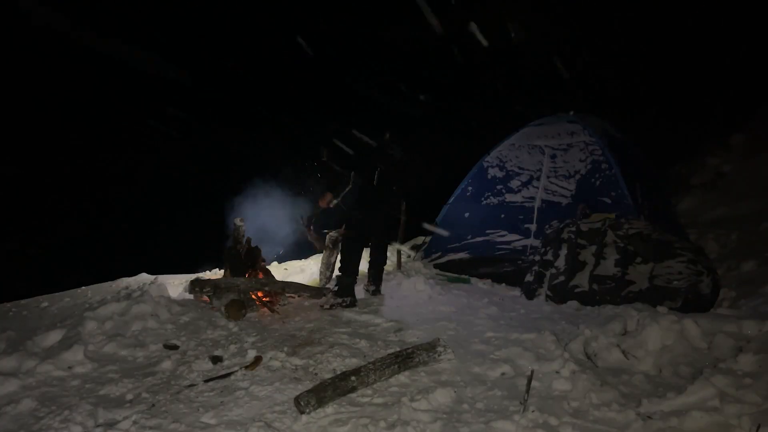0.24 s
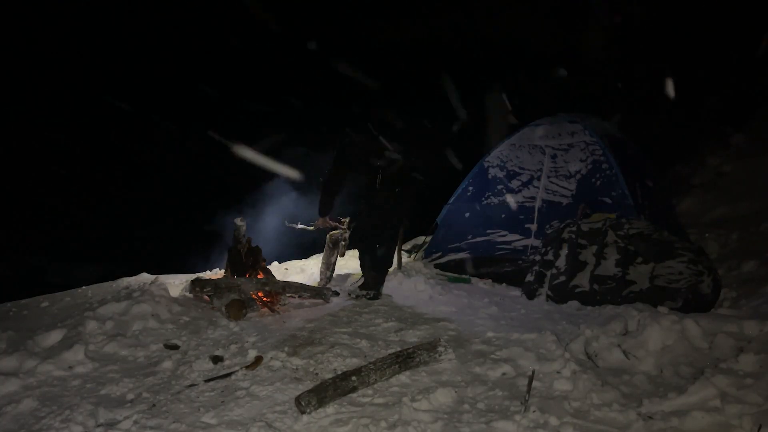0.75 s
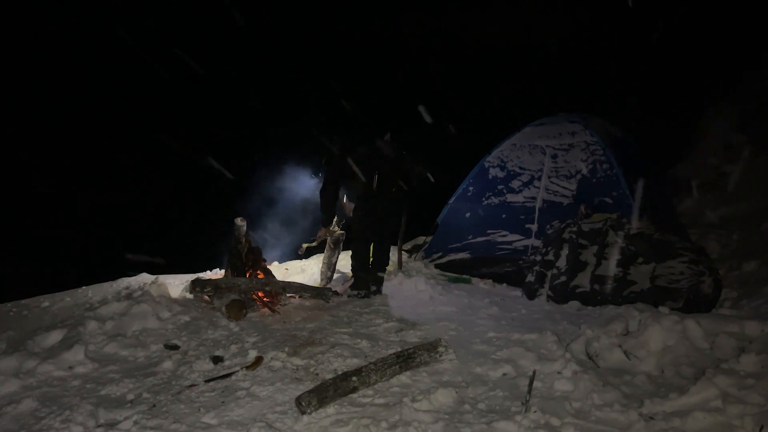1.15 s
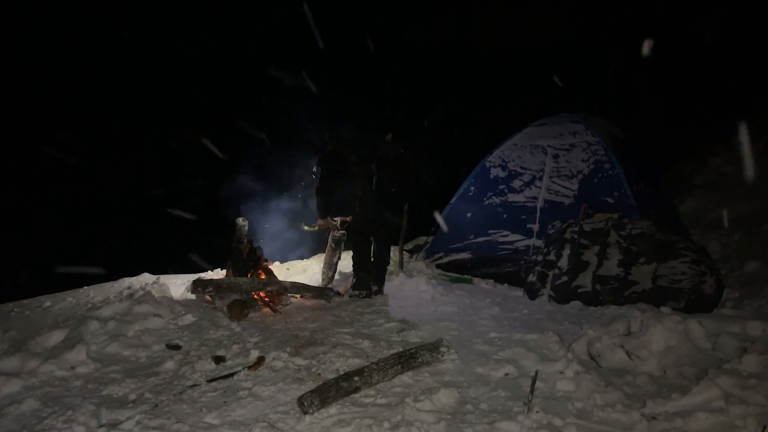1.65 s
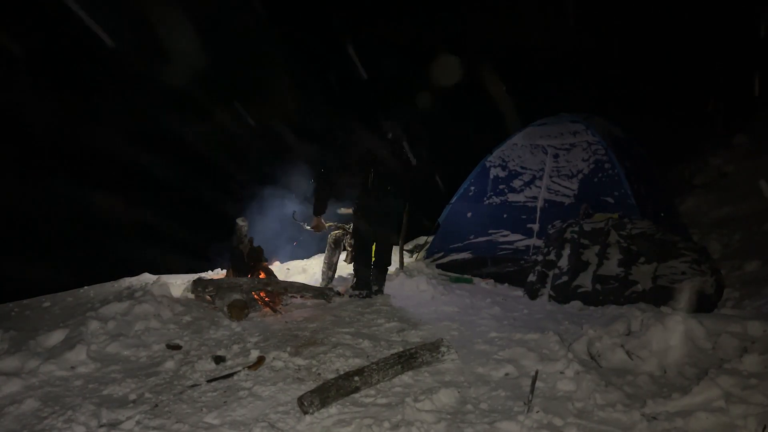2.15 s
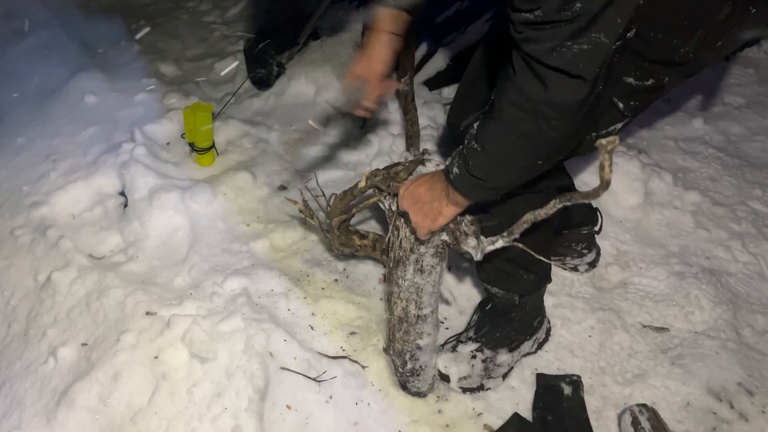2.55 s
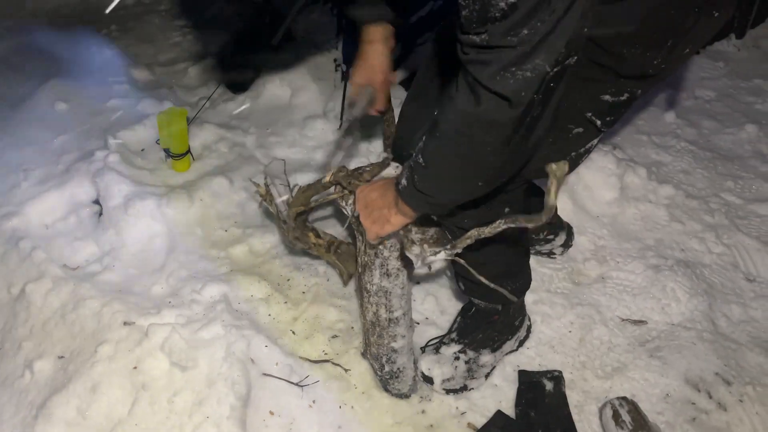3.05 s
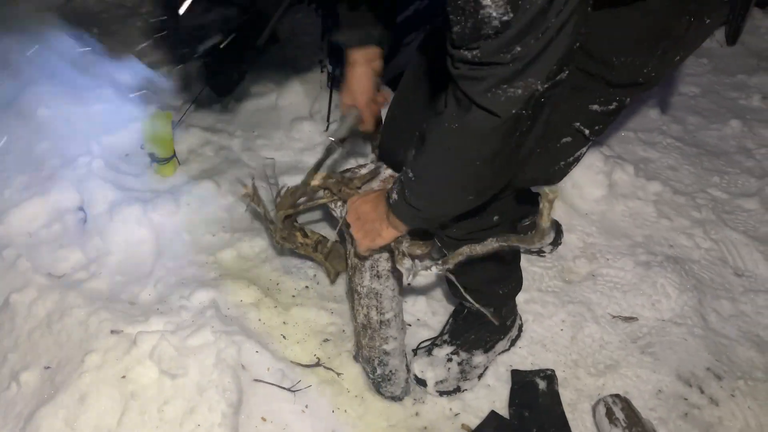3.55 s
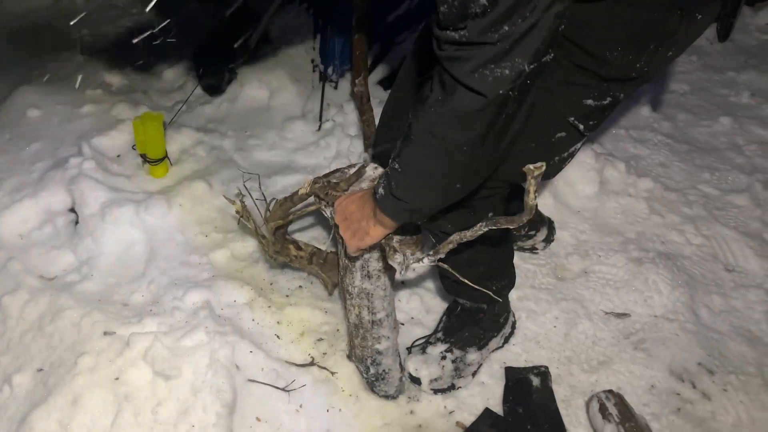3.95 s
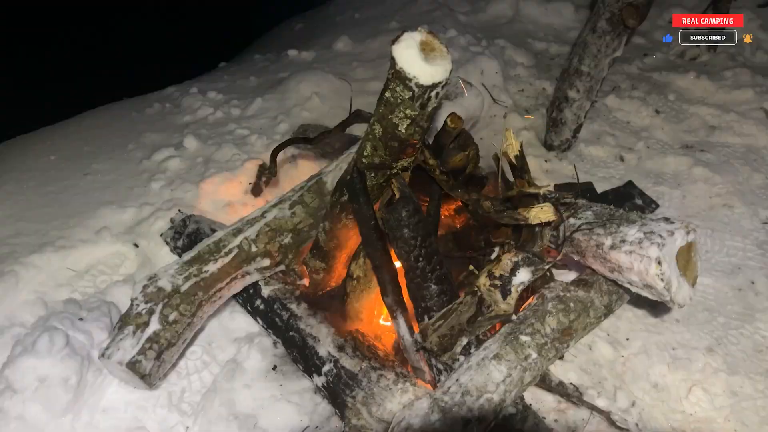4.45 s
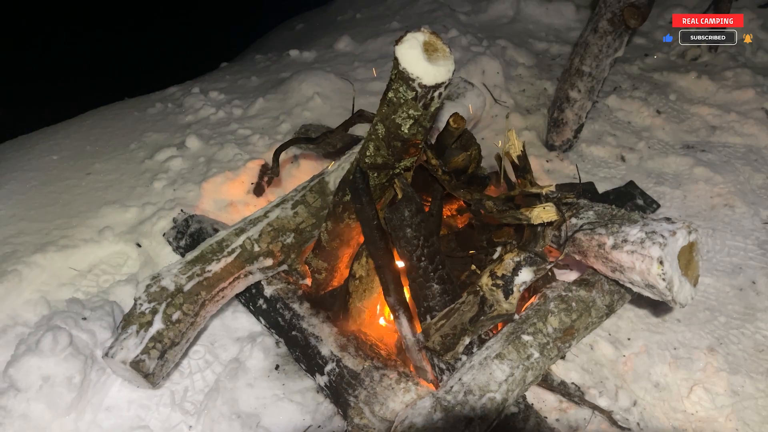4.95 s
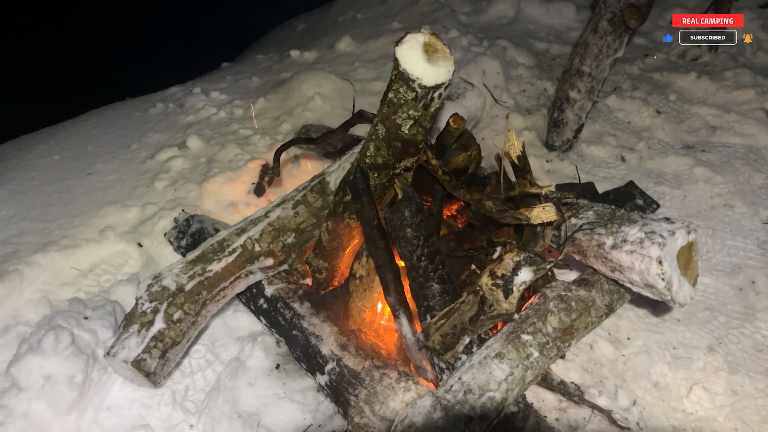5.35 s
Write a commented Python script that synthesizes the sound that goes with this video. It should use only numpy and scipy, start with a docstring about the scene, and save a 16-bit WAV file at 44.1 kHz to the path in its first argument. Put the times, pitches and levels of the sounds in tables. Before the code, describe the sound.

A windy snow camp heard close and dry. Low rumble is strongest at the start, calmer in the middle and heaviest at the end. Gusts near one second bring soft air thumps and two bright snaps. A steady row of hard tick-knocks, like something striking wood, occupies the middle, each very short. Afterwards gusts return with grainy snow hiss, fire snaps and sizzling spits.

```python
"""At a snowy camp by night, wind rumbles on a pair of close microphone ports over a steady far hiss.
Turbulence is noise shaped in spectrum and level; gusts carry snow past, with a fine high snow hiss
that swells with them, stronger after 4 s. A campfire snaps as noise cracks with wood rings, and spits
as thin high noise bursts. Even double clicks from the left are struck resonances; two brief husky
tones glide upward."""
import sys
import numpy as np
from scipy import signal
from scipy.fft import rfft, irfft, next_fast_len
from scipy.io import wavfile
from scipy.ndimage import uniform_filter1d, map_coordinates

SR = 44100
rng = np.random.default_rng(int(sys.argv[2]) if len(sys.argv) > 2 else 0)


def store_wav(level_fs):
    """Save 16-bit WAV to argv[1]."""
    pcm = np.round(np.clip(np.atleast_2d(level_fs), -1, 1) * 32767)
    wavfile.write(sys.argv[1], SR, pcm.T.astype(np.int16))


N = 246959  # samples

# Spectra below are relative shapes, since each noise is brought to rms 1.
# Wind strength and the deepest heave, before fixed offsets: time_s, strength_db, heave_db
WIND_COURSE = [(0.0, -34, -43), (0.81, -38.5, -50), (0.97, -37, -58), (1.5, -40, -55), (2.04, -37.5, -57),
               (2.17, -38.5, -56), (2.63, -38, -66), (2.87, -38.5, -64), (3.18, -38.5, -49),
               (3.9, -39, -60), (4.37, -30, -45), (4.7, -29, -46), (5.29, -26.5, -30), (5.6, -28.5, -32.5)]
# How much more the eddies differ between the ports: time_s, difference_db
CROSSWIND_COURSE = [(0, 9), (1.6, 3), (2.2, 2), (4.2, 0), (5.6, -7)]
# Spectrum of the deepest wind heave: frequency_hz, density_db (per Hz)
HEAVE_SPECTRUM = [(12, -42), (22, -24), (32, -13), (45, 13), (58, 11), (75, -45)]
# Spectrum of the wind rumble: frequency_hz, density_db (per Hz)
RUMBLE_SPECTRUM = [(26, -57), (45, -24.5), (64, 0), (81, 1), (104, -0.5), (145, -8), (300, -17), (390, -31),
                   (660, -120)]
# Spectrum of the small eddies: frequency_hz, density_db (per Hz)
FLUTTER_SPECTRUM = [(90, -14.5), (160, 1), (300, -4.5), (600, -7.5), (1000, -18), (1600, -54)]
FLUTTER_DB, FLUTTER_GROWS = -44, 0.27  # at mean wind; dB for each dB of wind
# Gusts that carry snow past: start_s, hold_s, snow_db, flutter_db
GUST_EVENTS = [(-.03, 0.35, -55.5, -42.5), (.98, .31, -46.5, -35), (1.41, 0.13, -46, -36.5),
               (4.2, .4, -49, -37), (4.668, 0.079, -44, -38), (4.852, 0.1, -45, -35),
               (5.153, 0.24, -48.5, -38), (5.46, .2, -50.5, -42)]
GUST_ATTACK_S, GUST_FALL_DB_PER_S = 0.033, 142
# Spectrum of blown snow: frequency_hz, density_db (per Hz)
SNOW_SPECTRUM = [(600, 4), (1200, 14), (2500, 8.5), (3600, 7), (5000, 5.5), (6500, 5), (9000, -0.5),
                 (10500, -31), (12500, -12), (15700, -20), (16000, -60)]
DRIFT_DB, DRIFT_GROWS = -61.5, 2  # loose snow at mean wind; dB for each dB of wind
SNOW_PATCHY_DB = 1  # spread of the random patches in snow and fine hiss
# Spectrum of the fine high snow hiss, which also shapes the spits: frequency_hz, density_db (per Hz)
FINE_HISS_SPECTRUM = [(9000, -24), (12000, -7), (14000, 2), (15700, -5), (16100, -50)]
FINE_HISS_DB = -14  # over the snow
FINE_HISS_RISE_S, FINE_HISS_RISE_DB = 4, 4  # when the fine hiss grows stronger, and by how much
# Spectrum of the far hiss: frequency_hz, density_db (per Hz)
HISS_SPECTRUM = [(240, -15), (500, -2), (900, -2), (1400, -9), (2100, -7.5), (3500, -22), (5200, -24.5),
                 (6000, -27), (7500, -19), (8300, -23.5), (9200, -33), (10400, -18.5), (11200, -22),
                 (12200, -37), (13200, -46)]
# Phase of the hiss as it wraps round the ports from the left: frequency_hz, left_lead_rad
HISS_PHASE_LEAD = [(100, .2), (600, 2.1), (1000, 2.8), (1600, 5.4), (2300, 6.4), (3350, 9.2), (3800, 12.3),
                   (4700, 14.6), (5500, 14.6), (6500, 12.1), (7600, 13.4), (8500, 12.6), (9000, 12.5),
                   (9700, 10), (11000, 8.2), (11800, 6.3)]
# Shading of the hiss between the ports: frequency_hz, left_over_right_db
HISS_SHADING = [(400, 1.5), (800, 4.5), (1100, -0.6), (1600, 3), (2600, -2.5), (4400, -.3), (5200, 11.5),
                (6400, 0), (7000, 5.5), (8600, .2)]
HISS_DB, HISS_SCATTERED_DB = -37, -9.5  # direct hiss; the part each port hears alone, over it
# Air pushes on the ports: time_s, peak_db, pitch_hz
AIR_PUSHES = [(.052, -19, 344), (.28, -21.5, 240), (1.018, -21.5, 520), (1.04, -18.5, 178),
              (1.119, -19, 397), (1.139, -16.5, 520), (1.142, -17.5, 150), (1.321, -20, 530),
              (1.404, -19, 700), (4.442, -16.5, 440), (4.561, -18, 221), (4.952, -9, 497)]
ONE_CYCLE_HZ, SHORTENS = 314, 0.61  # a push at this pitch lasts one cycle; higher ones fewer, by this power
# Fire snaps; ring and knock are relative to the crack before a shared lift:
# start_s, peak_db, wood_pitch_hz, ring_db, low_knock_hz, low_knock_db, left_over_right_db
FIRE_SNAPS = [(1.193, 2, 2920, 4, 1750, -1, 4.5), (1.493, -1, 5130, -9, 577, -11.5, 4.5),
              (2.2941, -16, 7600, -13, 1760, -15, 4), (2.9804, -22.5, 4640, -6, 2950, -6, 5),
              (4.6235, -7.5, 3775, -2, 1670, -2, 5.5), (4.705, -25, 3680, 2, 780, -4, -0.5),
              (4.7729, -16.5, 5730, 2, 533, 3, 1), (5.026, -24, 4180, -11, 620, -3, -1),
              (5.2579, -18.5, 5820, -8, 850, -5, 0.1), (5.2886, -26.5, 4140, 6, 500, -7, -0.5),
              (5.4829, -13.5, 5210, 2, 555, -4, 1)]
# Spectrum of the crack: frequency_hz, density_db (per Hz)
CRACK_SPECTRUM = [(300, -29), (900, 1.5), (3000, 0), (6000, 3.5), (9000, 0.5), (15000, -1), (16600, -76)]
# Rings of splitting wood: pitch_multiple, level_db
WOOD_RINGS = [(.65, -4.5), (1, -0.5), (1.8, -19.5)]
SNAP_T60_S = 0.011
ECHO_S, ECHO_DB = .0068, -21  # a nearby surface answers each snap
# Double clicks: start_s, tick_peak_db, brightest_tick_hz, knock_hz
DOUBLE_CLICKS = [(2.2538, -18.5, 6600, 786), (2.5068, -8.5, 6100, 1580), (2.7846, -6, 6240, 840),
                 (3.0376, -6, 6840, 830), (3.2993, -7, 6200, 872), (3.5518, -5.5, 5540, 840),
                 (3.8115, -6.5, 5700, 1300), (4.0629, -7, 5350, 1140), (4.3309, -8, 5100, 730)]
# Further rings of the tick: frequency_hz, width_hz, level_db
TICK_RINGS = [(3020, 1050, -6), (9800, 1340, -6), (11940, 1800, -9.5)]
# Lower rings of the knock: frequency_hz, width_hz, level_db
KNOCK_RINGS = [(310, 400, -1.5), (513, 190, -21)]
KNOCK_DB, KNOCK_DELAY_S = 4, 0.001213  # knock over the tick, and its delay
RATTLE_DB, TICK_PAN_DB = -12, 5  # start of the decaying rattle in the force; tick, left over right
# Brief rising tones: start_s, peak_db
RISING_BLIPS = [(2.909, -32.5), (5.237, -32)]
BLIP_S, BLIP_FROM_HZ, BLIP_TO_HZ = 0.0487, 770, 1123  # the glide before its random waver
# The loudest thin high spits: start_s, peak_db
LOUD_SPITS = [(4.3051, -21), (4.6423, -26), (4.6628, -31), (4.6814, -28), (4.7571, -35), (5.0674, -35),
              (5.1871, -33), (5.2824, -32), (5.3268, -33), (5.4281, -29), (5.4685, -30), (5.5149, -31)]
SPATTER_FROM_S, SPATTER_DB, SPATTER_SPREAD_DB = 4.2, -44, 3  # random spits: start, least peak, mean excess
PORT_LAG = .000011  # s of right-port lag per dB that it is quieter, at low frequency
TOP_HZ = 16688  # band limit


def amp(db):
    """Logarithmic level: the amplitude gain of a level in dB."""
    return 10 ** (np.asarray(db) / 20)


def unit(x):
    """Normalization: the signal at rms 1."""
    return x / np.sqrt(np.mean(x ** 2) + 1e-20)


def along(points, hz):
    """Interpolation of (frequency, value) points along a logarithmic frequency axis."""
    f, v = np.transpose(points)
    return np.interp(np.log(hz + 1), np.log(f + 1), v)


def curves(rows):
    """Linear interpolation in time: one curve for each column after the time."""
    s, *columns = np.transpose(rows)
    return [np.interp(np.arange(N) / SR, s, column) for column in columns]


def wobble(rate):
    """Smooth random fluctuation: spline through random knots, rate of them a second."""
    knots = rng.standard_normal(int(N * rate / SR) + 4)
    return map_coordinates(knots, [np.arange(N) * rate / SR])


def filtered(x, response):
    """Linear filtering: the spectrum multiplied by a complex response of frequency."""
    m = next_fast_len(x.shape[-1] + 8192)
    spectrum = rfft(x, m) * response(np.fft.rfftfreq(m, 1 / SR))
    return irfft(spectrum, m)[..., :x.shape[-1]]


def modes(table):
    """Modal superposition: causal resonances added with alternating sign."""
    def resonance(f, center, width, db):
        return amp(db) * 1j * f * width / (center * center - f * f + 1j * f * width)
    return lambda f: sum((-1) ** k * resonance(f, *row) for k, row in enumerate(table))


def noise(spectrum, patchy_db):
    """Coloured noise of rms 1, with random gain over patches of time and frequency."""
    z = signal.stft(rng.standard_normal(N + 512), nperseg=512)[2]
    field = uniform_filter1d(rng.standard_normal(z.shape), size=6, axis=0)
    field = uniform_filter1d(field, size=10, axis=1)
    x = signal.istft(z * amp(patchy_db * unit(field)), nperseg=512)[1][:N]
    return unit(filtered(x, lambda hz: amp(along(spectrum, hz))))


def pair(mid, side):
    """Sum and difference: left and right from the shared and the opposed part."""
    return np.array([mid + side, mid - side])


def add(track, s, sound, db, pan_db, shade_hz=2500):
    """Diffraction: a sound of peak db reaches the far port duller and a little later."""
    half = pan_db * np.array([[.5], [-.5]])

    def arrival(f):
        shading = amp(db + half * f ** 2 / (f ** 2 + shade_hz ** 2))
        lead_s = half * PORT_LAG / (1 + f / 5000)
        return shading * np.exp(2j * np.pi * f * lead_s)
    both = filtered(sound, arrival) / np.abs(sound).max()
    part = track[:, round(s * SR):][:, :len(sound)]
    part += both[:, :part.shape[1]]


def wind_db():
    """Wind forcing: its strength, its swing about the mean, and the level of the heave."""
    strength_db, heave_db = curves(WIND_COURSE)
    return strength_db, strength_db - strength_db.mean(), heave_db


def gusts():
    """Gust envelope: gains of snow and flutter that rise quickly, hold and decay exponentially."""
    t = np.arange(N) / SR
    gains = 0
    for s, hold, *levels_db in GUST_EVENTS:
        rise = np.clip((t - s) / GUST_ATTACK_S, 0, 1)
        fall_db = GUST_FALL_DB_PER_S * np.maximum(t - s - GUST_ATTACK_S - hold, 0)
        gains = gains + rise * amp(np.c_[levels_db] - fall_db)
    return gains


def wind_rumble():
    """Coherent pressure: slow eddies press both ports nearly alike."""
    rumble_db, _, heave_db = wind_db()
    cross_db, = curves(CROSSWIND_COURSE)
    heave = pair(noise(HEAVE_SPECTRUM, 1.5), amp(-20) * noise(HEAVE_SPECTRUM, 1.5))
    rumble = pair(noise(RUMBLE_SPECTRUM, 0.5), amp(cross_db - 15.5) * noise(RUMBLE_SPECTRUM, 0.5))
    heave_gain = amp(heave_db + 4.5 + 2.7 * wobble(3.23))
    rumble_gain = amp(rumble_db + 3.0 + 1.4 * wobble(4.8))
    return heave_gain * heave + rumble_gain * rumble


def wind_flutter():
    """Incoherent turbulence: smaller eddies come in lumps, differ more and swell in gusts."""
    cross_db, = curves(CROSSWIND_COURSE)
    flutter = pair(noise(FLUTTER_SPECTRUM, 1.5), amp(cross_db - 4.5) * noise(FLUTTER_SPECTRUM, 4.0))
    eddies = np.hypot(amp(FLUTTER_DB + FLUTTER_GROWS * wind_db()[1]), gusts()[1])
    return eddies * amp(1.36 * wobble(6.1) + 2.04 * wobble(30)) * flutter


def blown_snow_gain():
    """Addition of powers: loose snow drifting with the wind, and snow carried by gusts."""
    return np.hypot(gusts()[0], amp(DRIFT_DB + DRIFT_GROWS * wind_db()[1]))


def snow():
    """Granular noise: wind and gusts drive blown snow past the ports."""
    side = amp(curves(CROSSWIND_COURSE)[0] - 5) * noise(SNOW_SPECTRUM, SNOW_PATCHY_DB)
    grains = pair(noise(SNOW_SPECTRUM, SNOW_PATCHY_DB), side)
    return blown_snow_gain() * amp(0.93 * wobble(36)) * grains


def fine_hiss():
    """Modulated noise: a fine high snow hiss swells with the wind and gusts, stronger after 4 s."""
    rise_db = FINE_HISS_RISE_DB * (np.arange(N) / SR > FINE_HISS_RISE_S)
    swell = blown_snow_gain() * amp(FINE_HISS_DB + rise_db)
    side = amp(-26) * noise(FINE_HISS_SPECTRUM, SNOW_PATCHY_DB)
    return swell * amp(2.4 * wobble(70)) * pair(noise(FINE_HISS_SPECTRUM, SNOW_PATCHY_DB), side)


def far_hiss():
    """Interaural phase and shading: one hiss heard by both ports, plus a little each hears alone."""
    half = np.array([[.5], [-.5]])

    def wrap(f):
        return amp(half * along(HISS_SHADING, f)) * np.exp(1j * half * along(HISS_PHASE_LEAD, f))
    direct = filtered(noise(HISS_SPECTRUM, patchy_db=1.02), wrap)
    scattered = np.array([noise(HISS_SPECTRUM, patchy_db=0.5), noise(HISS_SPECTRUM, patchy_db=1.1)])
    return amp(HISS_DB + 0.1 * wobble(2.02)) * (direct + amp(HISS_SCATTERED_DB) * scattered)


def air_pushes():
    """Pressure pulse: each push is a cosine of about a cycle under a Gaussian envelope."""
    out = np.zeros((2, N))
    for s, db, hz in AIR_PUSHES:
        u = np.arange(-1200, 1200) / SR * hz  # time in cycles from the crest
        cycles = (ONE_CYCLE_HZ / hz) ** SHORTENS
        push = np.cos(2 * np.pi * u) * np.exp(-(2 * u / cycles) ** 2)
        add(out, s + 0.003 - 1200 / SR, push, db, pan_db=4.5, shade_hz=60)  # crest 3 ms after s
    return out


def fire_snaps():
    """Impulsive fracture: a noise crack also rings the splitting wood, and a surface echoes it."""
    out, t = np.zeros((2, N)), np.arange(2048) / SR
    for s, db, pitch_hz, ring_db, low_hz, low_db, pan_db in FIRE_SNAPS:
        crack = unit(filtered(rng.standard_normal(len(t)), lambda f: amp(along(CRACK_SPECTRUM, f))))
        wood = np.zeros(len(t))
        for multiple, mode_db in [(low_hz / pitch_hz, low_db - ring_db), *WOOD_RINGS]:
            drift = 0.17 * np.cumsum(rng.standard_normal(len(t)))  # the phase wanders, so the ring is dull
            phase = 2 * np.pi * (multiple * pitch_hz * t + rng.random()) + drift
            wood += amp(ring_db + mode_db + 7.5) * np.sin(phase)
        burst = amp(-60 * t / SNAP_T60_S) * (crack + wood)
        burst += amp(-22 - 60 * t / 0.076) * crack  # debris patters after
        burst *= (1 - np.exp(-t / 0.00046)) ** 2  # soft onset
        add(out, s, burst, db, pan_db)
        add(out, s + ECHO_S, burst, db + ECHO_DB, pan_db)
    return out


def double_clicks():
    """Forced resonance: a sharp tick chatters on, with a duller knock about a millisecond later."""
    out, t = np.zeros((2, N)), np.arange(1024) / SR
    creep = 0.00099  # s of faint scraping before the contact lets go
    after_tick = t - creep
    after_knock = after_tick - KNOCK_DELAY_S
    for s, db, tick_hz, knock_hz in DOUBLE_CLICKS:
        chatter = amp(-60 * np.abs(after_tick) / np.where(t < creep, .0015, .005))
        chatter += 0.73 * amp(-60 * np.abs(after_knock) / 0.0014)
        chatter += amp(RATTLE_DB - 60 * t / 0.039)
        force = chatter * rng.standard_normal(len(t))
        force[round(creep * SR)] = 4  # the release itself
        tick = modes([TICK_RINGS[0], (tick_hz, 1800, 0), *TICK_RINGS[1:]])
        add(out, s, filtered(force, tick), db, TICK_PAN_DB)
        blow = np.exp(-(after_knock / 0.00012) ** 2)  # a soft contact
        blow -= 0.3 * np.exp(-((after_knock + 0.00045) / .0001) ** 2)  # a pull just before it
        knock = modes([*KNOCK_RINGS, (knock_hz, 1300, 0)])
        add(out, s, filtered(blow, knock), db + KNOCK_DB, pan_db=4.0)
    return out


def rising_blips():
    """Frequency and amplitude modulation: a short upward glide, made husky by random wavering."""
    out = np.zeros((2, N))
    count = round(BLIP_S * SR)
    for s, db in RISING_BLIPS:
        waver = 1 + .06 * wobble(250)[:count]
        pitch_hz = np.linspace(BLIP_FROM_HZ, BLIP_TO_HZ, count) * waver
        tone = np.sin(2 * np.pi * np.cumsum(pitch_hz) / SR)
        envelope = np.hanning(count) ** 0.17 * amp(3.4 * wobble(260)[:count])
        add(out, s, envelope * tone, db, pan_db=13)
    return out


def fire_spits():
    """Decaying noise: tiny high bursts, the weak ones falling at random late in the scene."""
    out, t = np.zeros((2, N)), np.arange(2048) / SR
    span_s = N / SR - SPATTER_FROM_S
    spatter = [(SPATTER_FROM_S + a * span_s, SPATTER_DB - SPATTER_SPREAD_DB * np.log(b))
               for a, b in rng.random((60, 2))]
    for s, db in [*LOUD_SPITS, *spatter]:
        burst = amp(-60 * t / 0.0061) * rng.standard_normal(len(t))
        spit = filtered(burst, lambda f: amp(along(FINE_HISS_SPECTRUM, f)))
        add(out, s, spit, db, pan_db=-1.0)
    return out


def scene():
    """Superposition: all sources add at the two ports."""
    weather = wind_rumble() + wind_flutter() + snow() + fine_hiss() + far_hiss() + air_pushes()
    fire = fire_snaps() + fire_spits()
    return weather + fire + double_clicks() + rising_blips()


def record(dry):
    """Saturation and band limiting: full scale is a ceiling, then the top band is cut."""
    return filtered(np.clip(dry, -1, 1), lambda hz: hz < TOP_HZ)


dry = scene()
out = record(dry)
store_wav(out)
```